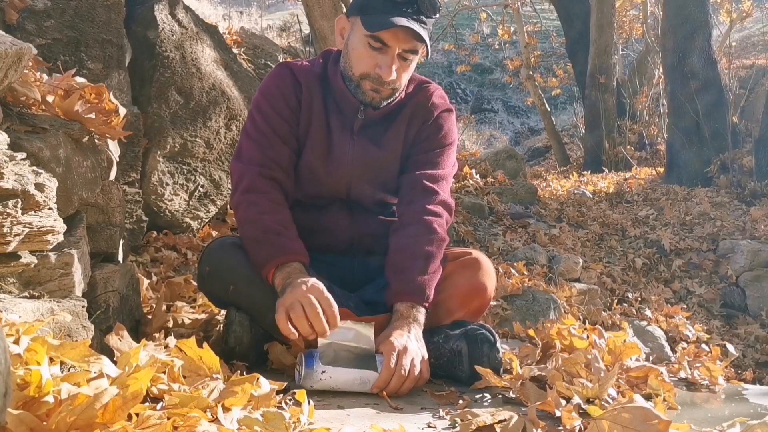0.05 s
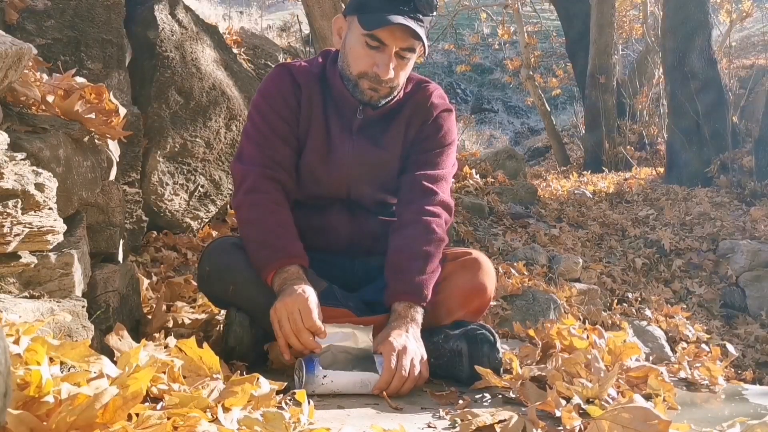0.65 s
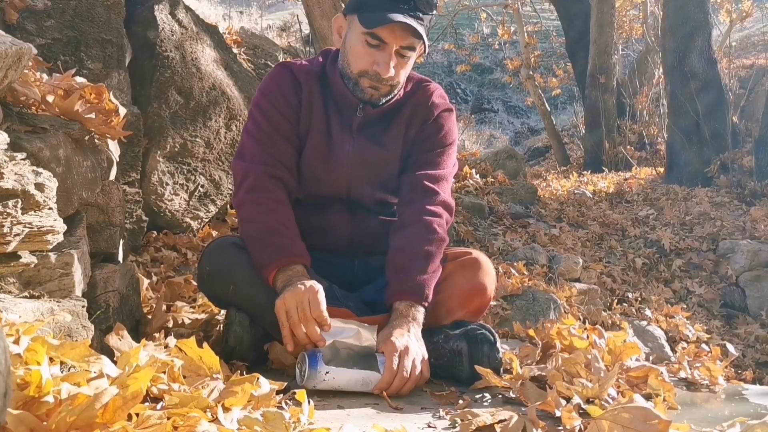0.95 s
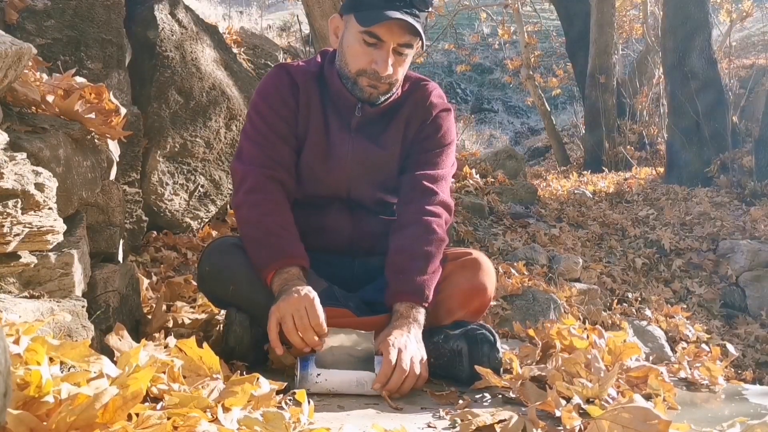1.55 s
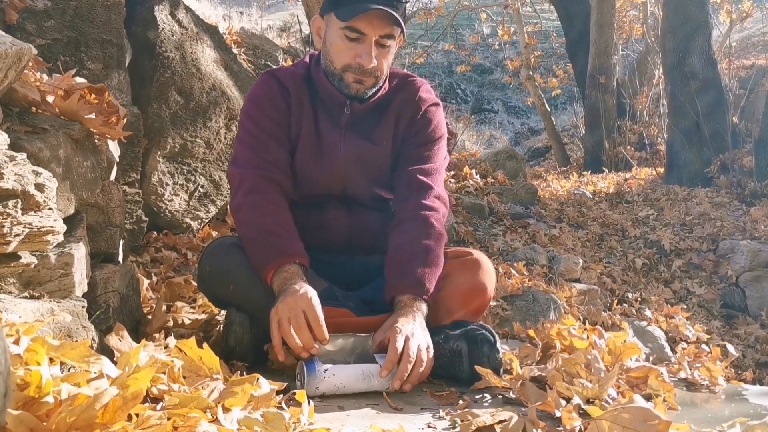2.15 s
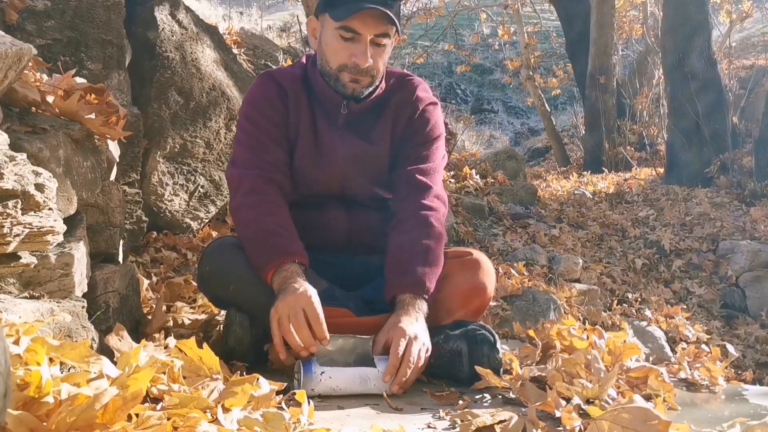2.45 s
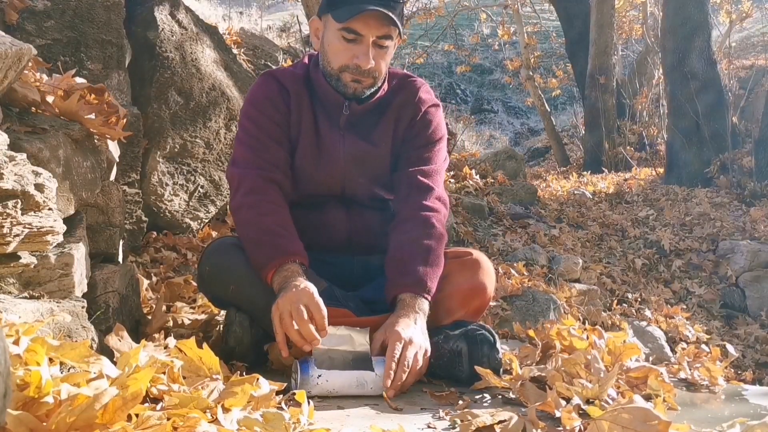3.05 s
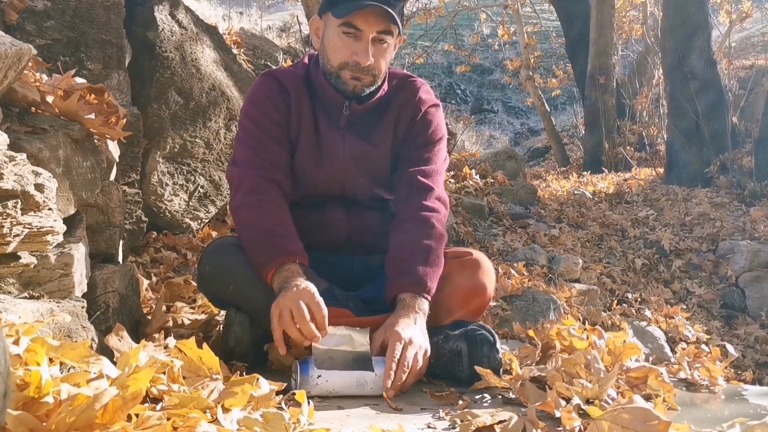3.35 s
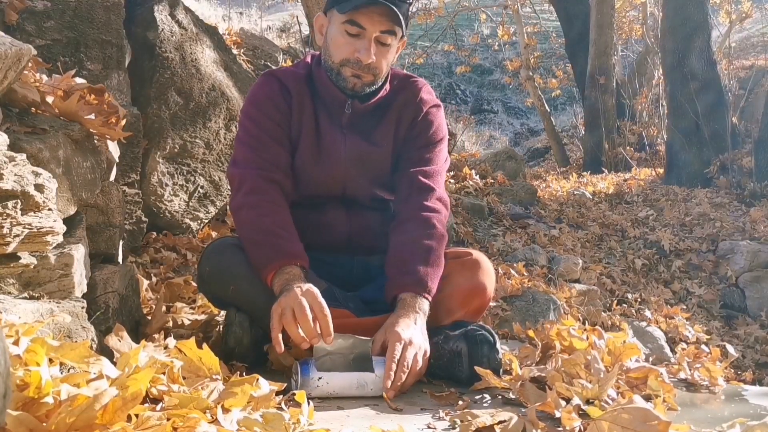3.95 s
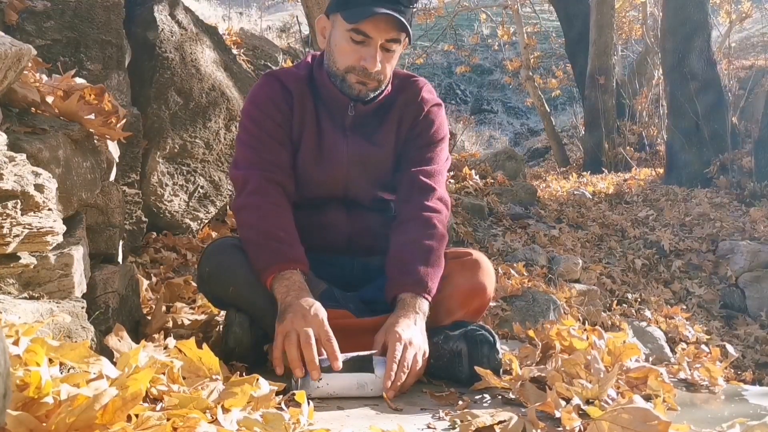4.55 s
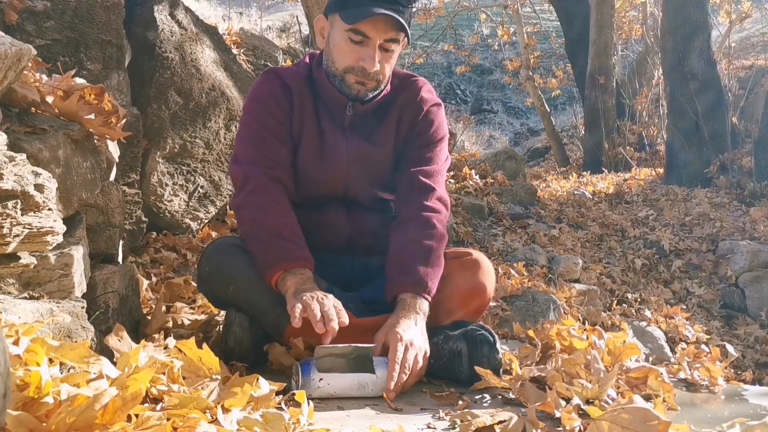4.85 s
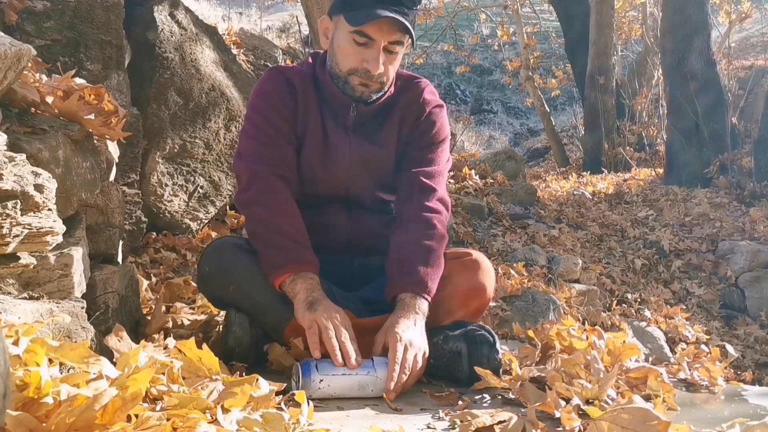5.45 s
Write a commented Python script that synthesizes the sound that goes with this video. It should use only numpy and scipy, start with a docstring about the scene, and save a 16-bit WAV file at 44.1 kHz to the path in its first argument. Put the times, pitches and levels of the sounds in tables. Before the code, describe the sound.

Outdoors, with the sound almost entirely in the right channel, thin metal cracks and crinkles in irregular bursts as a blade scrapes through a drink can. The cutting eases briefly, then the snaps come thicker as the can is bent open and rocks on a stone with soft, dull thuds. Underneath are low puffs of wind on the microphone and a few very faint, thin whistles from a far bird.

```python
"""A light breeze rumbles on the microphone as a knife starts to scrape through an aluminium drink can
lying on a stone. The thin wall buckles in short snaps between strokes; rocks and dry leaves scatter the
sound. Puffs of air bump the microphone, and from 1.3 s a far bird whistles. After a lull the flap is bent
open in more snaps, and from 4.4 s the can rocks on the stone. Nearly everything is on the right channel."""
import sys
import numpy as np
from scipy import signal
from scipy.fft import rfft, irfft, next_fast_len
from scipy.io import wavfile
from scipy.ndimage import uniform_filter1d, map_coordinates

SR = 44100
rng = np.random.default_rng(int(sys.argv[2]) if len(sys.argv) > 2 else 0)


def transcribe(u):
    """Save the signal u as a 16-bit wav file named by the first command-line argument.

    u: samples, shape (n,) or (channels, n), limited to [-1, 1]; the rate is SR.
    q: integer samples, one column per channel.
    """
    v = np.clip(np.atleast_2d(u).T, -1, 1)
    q = np.round(v * 32767).astype(np.int16)
    wavfile.write(sys.argv[1], SR, q)


N = 242991

# bright spectrum of tearing metal, for blade grit and cracks: frequency_hz, level_db
TEAR_SPECTRUM = [(150, -58.5), (500, -30.5), (2500, -4.5), (4800, -5.5), (7000, -1), (11000, 2.5),
                 (13000, 4), (14200, -4.5), (15600, -2)]


def amp(db):
    """Decibels to gain."""
    return 10 ** (np.asarray(db) / 20)


def unit(x):
    """Scale to rms 1."""
    return x / np.sqrt(np.mean(x ** 2) + 1e-20)


def along(points, hz):
    """Read (frequency_hz, value) points on a log frequency axis."""
    points_hz, values = np.transpose(points)
    return np.interp(np.log(hz + 1), np.log(points_hz + 1), values)


def filtered(x, response):
    """EQ x with a gain given as a function of frequency."""
    n = x.shape[-1]
    padded = next_fast_len(n + 4096)
    return irfft(rfft(x, padded) * response(np.fft.rfftfreq(padded, 1 / SR)), padded)[..., :n]


def noise(spectrum, n):
    """n samples of coloured noise at rms 1."""
    return unit(filtered(rng.standard_normal(n), lambda hz: amp(along(spectrum, hz))))


def wobble(rate, n):
    """A smooth random curve, rate knots a second."""
    knots = rng.standard_normal(int(n * rate / SR) + 4)
    return map_coordinates(knots, [np.arange(n) * rate / SR])


def add(track, start_s, sound):
    """Mix a sound into the track."""
    start = max(round(start_s * SR), 0)
    part = track[start:start + len(sound)]
    part += sound[:len(part)]


def tone(hz, t):
    """A sine of rms 1 at a random phase."""
    return np.sqrt(2) * np.sin(2 * np.pi * (hz * t + rng.random()))


def burst(x, t, attack_s, hold_s, t60_s):
    """Shape x into a hit: driven while the metal gives way, then dying."""
    envelope = (1 - np.exp(-t / attack_s)) * amp(-60 * np.maximum(t - hold_s, 0) / t60_s)
    return unit(x * envelope) * np.sqrt(np.mean(envelope ** 2))


def breeze():
    """Eddies make a low, lumpy rumble on the microphone, with a few single pushes of air."""
    # rise and fall of the wind: time_s, relative_db
    swells = [(0.0, -73.5), (0.11, -64), (0.64, -65.5), (0.95, -66), (1.2, -68), (1.61, -63.5), (1.79, -71),
              (2.47, -65.5), (2.67, -57.5), (2.81, -55.5), (3.19, -77.5), (3.93, -71), (4.21, -60),
              (4.47, -70.5), (5.09, -66.5), (5.51, -58.5)]
    # wind on the microphone: frequency_hz, level_db
    rumble_spectrum = [(8, -8), (22, 1.5), (38, -1.5), (60, -7), (100, -25.5), (160, -27.5), (400, -47.5),
                       (1500, -94.5)]
    # pushes of air: centre_s, peak_db
    puffs = [(0.491, -43.5), (0.851, -31.5), (1.052, -46), (1.273, -46.5), (1.45, -35.5), (2.221, -46.5),
             (2.702, -34), (3.551, -47), (4.147, -38), (5.308, -38.5), (5.41, -45)]
    swell_s, swell_db = np.transpose(swells)
    eddies_db = 1.5 * wobble(7, N)
    strength_db = np.interp(np.arange(N) / SR, swell_s, swell_db) + eddies_db
    out = amp(strength_db + 9) * noise(rumble_spectrum, N)
    t = np.arange(-SR // 20, SR // 20) / SR
    phase = 2 * np.pi * 42.75 * t
    push = phase / (1 + (phase / 2.38) ** 2) ** 3  # pressure swings once down and once up
    push = push / np.abs(push).max() * signal.windows.tukey(len(t))
    for centre_s, peak_db in puffs:
        add(out, centre_s + t[0], amp(peak_db) * push)
    return out


def dented(x, depth_db):
    """Each dent shifts the wall's resonances: fresh peaks and dips on a 170 Hz grid."""
    knots = rng.standard_normal(200)
    return unit(filtered(x, lambda hz: amp(depth_db * map_coordinates(knots, [hz / 170], mode="mirror"))))


def can_ring(t, knock_db, crinkle_db):
    """The knock feeds the can's low modes and the crinkle its high ones, at new strengths each time."""
    # modes of the whole can: pitch_hz, relative_db, t60_s
    modes = [(602.7, -3, 0.13), (905, -17.5, 0.74), (993, 0.5, 0.088), (1104, -12.5, 0.063),
             (1190, -18.5, 0.12), (1251, 3, 0.11), (1370, -25, 0.6), (1856, 1, .1), (2270, -1, .1),
             (2440, -19.5, .4), (2940, -13.5, 0.24), (3570, -7, 0.18), (4400, -17, .12)]
    drive = [(1200, knock_db), (1900, crinkle_db)]
    out, highest_hz = np.zeros(len(t)), modes[-1][0]
    for hz, relative_db, t60_s in modes:
        level_db = along(drive, hz) + relative_db + 4 * rng.uniform(-1, 1)
        detune = 0.035 * rng.uniform(-1, 1) * hz / highest_hz  # a dent retunes high modes most
        out += amp(level_db - 60 * t / t60_s) * tone(hz * (1 + detune), t)
    return out


def blade_scrapes():
    """The blade catches and slips along the cut edge; every slip ticks and briefly rings the wall."""
    # blade strokes: start_s, length_s, relative_db
    strokes = [(0.112, 0.028, -64.5), (0.256, .04, -52), (0.682, 0.042, -62.5), (0.749, 0.072, -44.5),
               (1.093, 0.037, -56.5), (1.215, 0.0076, -57), (1.494, 0.093, -57.5), (1.614, 0.065, -60),
               (2.049, 0.097, -56.5), (2.355, 0.1, -63), (2.532, 0.034, -53.5), (2.91, .02, -49.5),
               (3.136, 0.03, -53.5), (3.26, .015, -63.5), (3.774, 0.022, -60), (3.982, 0.013, -59),
               (4.049, 0.03, -58), (4.759, 0.017, -47.5), (4.959, 0.029, -57.5)]
    # the scraped wall: frequency_hz, level_db
    body_spectrum = [(100, -31.5), (350, -22.5), (650, -7), (950, 7), (1400, -10.5), (2500, -6.5),
                     (4000, -18), (7000, -18.5), (16000, -32)]
    slips_per_s, light_stroke_db = 380, -60
    out, t = np.zeros(N), np.arange(SR // 12) / SR
    for start_s, length_s, stroke_db in strokes:
        # a light stroke skates and is gritty; a heavy one digs in
        grit_db = -10.5 - 0.35 * (stroke_db - light_stroke_db)
        n = max(round(length_s * SR), 64)
        slips = (rng.random(n) < slips_per_s / SR) * rng.exponential(size=n) ** 2
        slips = (slips + 0.003) * signal.windows.tukey(n, 0.7)
        envelope = lambda t60_s: np.sqrt(np.abs(signal.fftconvolve(slips, amp(-60 * t / t60_s) ** 2)))
        with_tail = n + len(t) - 1
        body = unit(envelope(t60_s=0.04) * dented(noise(body_spectrum, with_tail), depth_db=4))
        grit = unit(envelope(t60_s=0.009) * noise(TEAR_SPECTRUM, with_tail))
        ticks = slips * rng.standard_normal(n)
        hollow = unit(signal.fftconvolve(ticks, can_ring(t, 0, 0) * (1 - t / t[-1])))
        scrape = body + amp(grit_db) * grit + amp(-7) * hollow
        add(out, start_s, amp(stroke_db - 1.5) * np.sqrt(n / with_tail) * scrape)
    return out


def surroundings(x):
    """Rocks, trunks and dry leaves scatter each band's energy into a smooth, bright tail."""
    # colour of the tail: frequency_hz, relative_db
    scatter_eq = [(200, -16), (700, -0.5), (1500, -7), (3000, -7.5), (5500, 2.5), (9000, 0), (15000, 0.5)]
    # decay of the tail: frequency_hz, t60_s
    decay_times = [(300, 0.18), (1000, 0.28), (3000, 0.47), (6000, 0.43), (11000, 0.37), (14500, 0.28),
                   (16000, 0.12)]
    hz, t, bands = signal.stft(x, SR, nperseg=256)
    power = uniform_filter1d(np.abs(bands) ** 2, size=7, axis=0)
    t = t[t < 1]
    bloom = 1 - np.exp(-(t / 0.014) ** 2)
    fade = (amp(-60 * t / along(decay_times, hz)[:, None]) * bloom) ** 2
    fade /= fade.sum(axis=1, keepdims=True)
    tail_power = signal.fftconvolve(power, fade, axes=1)[:, :bands.shape[1]]
    wash = signal.stft(rng.standard_normal(N), SR, nperseg=256)[2]
    tail = wash / wash.std() * np.sqrt(np.abs(tail_power)) * amp(along(scatter_eq, hz))[:, None]
    return signal.istft(tail, SR, nperseg=256)[1][:N]


def buckle_snaps():
    """Each buckle knocks the bent panel, crinkles the wall's dense upper modes and cracks as it tears."""
    # buckles of the sheet: start_s, knock_db, crinkle_db, crack_db, pitch_hz, cutoff_hz, t60_s
    buckles = [(0.3007, -40, -49, -66, 973, 1500, 0.038), (0.3083, -27.5, -19.5, -17.5, 585, 3500, 0.035),
               (.454, -26, -28, -24.5, 1254, 4200, 0.045), (0.4844, -35.5, -41.5, -39, 652, 6950, 0.065),
               (0.547, -62, -48, -54, 790, 3800, 0.076), (0.7915, -23.5, -24, -18, 988, 3820, 0.055),
               (0.9303, -25.5, -20, -14.5, 800, 3560, 0.04), (1.13, -46, -49.5, -56, 792, 1510, .12),
               (1.393, -67.5, -65.5, -53, 722, 6960, 0.16), (1.654, -37, -30, -31.5, 983, 7000, 0.047),
               (1.667, -25.5, -33, -52, 884, 3470, 0.066), (1.7176, -23.5, -28, -44, 1070, 4860, 0.06),
               (1.7952, -26, -20, -17.5, 916, 2205, 0.1), (1.859, -38.5, -50.5, -49, 1008, 3030, 0.098),
               (1.9607, -36, -47.5, -62, 1003, 2110, 0.18), (2.454, -37.5, -52, -67, 982, 3080, 0.063),
               (2.696, -30.5, -28, -76.5, 960, 4650, 0.062), (2.7742, -26, -23, -22.5, 1227, 3920, 0.062),
               (2.983, -51.5, -46, -59.5, 940, 1680, 0.073), (3.8824, -37.5, -25, -43, 874, 3150, 0.064),
               (4.108, -29.5, -25, -49.5, 1027, 4160, .051), (4.235, -68, -37.5, -37.5, 1260, 1490, 0.032),
               (4.252, -47.5, -47.5, -49, 953, 1510, 0.052), (4.297, -68, -33, -39, 970, 1870, 0.066),
               (4.359, -36.5, -34.5, -71, 766, 3930, 0.058), (4.417, -38, -52.5, -74.5, 655, 2300, 0.042),
               (4.5879, -37, -67, -84, 659, 2400, 0.054), (4.7736, -36.5, -29.5, -36.5, 777, 6040, 0.054),
               (4.824, -40, -41, -41, 700, 2830, 0.13), (4.845, -26.5, -23.5, -52, 806, 1890, 0.078),
               (5.0986, -25.5, -33.5, -55.5, 1094, 3120, 0.073),
               (5.134, -31.5, -45, -70, 1205, 2420, 0.066), (5.1669, -30.5, -28, -25, 812, 4520, 0.1),
               (5.1823, -27, -26.5, -16.5, 1250, 3940, 0.08), (5.224, -28.5, -27, -26.5, 657, 5340, 0.045),
               (5.441, -31, -32.5, -42, 580, 2310, .066), (5.4732, -27, -36.5, -51, 596, 2230, 0.065),
               (5.4892, -39.5, -41, -19.5, 792, 3560, 0.41)]
    # the panel's low modes: frequency_hz, level_db
    knock_spectrum = [(60, -51.5), (180, -30), (300, -18), (420, -19.5), (500, -1.5), (590, 1.5),
                      (700, -0.5), (900, 6.5), (1300, -6), (1800, -13.5), (4000, -40.5), (8000, -81)]
    # the wall's upper modes: frequency_hz, level_db
    crinkle_spectrum = [(100, -73.5), (300, -36), (900, -9.5), (1500, -6), (2400, -1.5), (3500, -5),
                        (6500, -4), (16000, -0.5)]
    # a tear lets the strained can jolt against the stone: frequency_hz, level_db
    jolt_spectrum = [(100, -34.5), (220, -16.5), (320, -17.5), (480, -2), (700, -9.5), (1500, -34.5)]
    n = SR // 4
    out, t = np.zeros(N), np.arange(n) / SR
    for start_s, knock_db, crinkle_db, crack_db, pitch_hz, cutoff_hz, t60_s in buckles:
        # a smaller crease is brighter and has a higher overtone
        overtone_hz = 2450 * (cutoff_hz / 4100) ** 0.22
        panel = dented(noise(knock_spectrum, n), depth_db=3.5) + amp(-1.5) * tone(pitch_hz, t)
        wall = filtered(noise(crinkle_spectrum, n), lambda hz: (1 + (hz / cutoff_hz) ** 6) ** -0.5)
        wall = dented(wall, depth_db=5) + amp(-6) * tone(overtone_hz, t)
        # a tear is a quick run of tiny fractures
        tear = dented(noise(TEAR_SPECTRUM, n) * amp(3.1 * wobble(1500, n)), depth_db=3)
        knock = amp(knock_db) * burst(panel, t, attack_s=0.0004, hold_s=0.0032, t60_s=t60_s)
        crinkle = amp(crinkle_db) * burst(wall, t, attack_s=0.00043, hold_s=0.0026, t60_s=0.99 * t60_s)
        crack = amp(crack_db) * burst(tear, t, attack_s=0.00056, hold_s=0.0039, t60_s=0.026)
        stone = noise(jolt_spectrum, n)
        jolt = amp(crack_db - 22.5) * burst(stone, t, attack_s=0.0008, hold_s=0.003, t60_s=0.025)
        ring = amp(-17.5) * can_ring(t, knock_db, crinkle_db) * (1 - np.exp(-t / 0.0015))
        # the panel's own mode outlasts the knock
        linger = amp(knock_db - 13 - 60 * t / (2.3 * t60_s)) * (1 - np.exp(-t / 0.001))
        ring += linger * tone(pitch_hz, t)
        add(out, start_s, knock + crinkle + crack + jolt + ring)
        # the metal starts to yield a moment before it gives way
        yielding = burst(wall + panel, t, attack_s=0.0017, hold_s=0.002, t60_s=0.017)
        add(out, start_s - 0.002, amp(max(crack_db, crinkle_db) - 20.5) * yielding)
    return out


def far_bird():
    """Thin whistles, each lower than the last, sag and fade, smeared by many paths between the trees."""
    # the bird's calls: start_s, length_s, level_db
    whistles = [(1.295, 0.16, -80), (1.95, .18, -77), (2.36, 0.15, -74), (3.584, 0.31, -76.5),
                (4.037, 0.1, -79.5)]
    pitch_hz, drift_hz_per_s, sag_hz_per_s, fade_db_per_s = 4660, 94, 320, 29.5
    out = np.zeros(N)
    for start_s, length_s, level_db in whistles:
        n = round(length_s * SR)
        t = np.arange(n) / SR
        hz = pitch_hz - drift_hz_per_s * start_s - sag_hz_per_s * t
        phase = 2 * np.pi * np.cumsum(hz) / SR
        blur = lambda: wobble(110, n) + wobble(420, n)
        whistle = blur() * np.sin(phase) + blur() * np.cos(phase)
        envelope = signal.windows.tukey(n, 0.5) * amp(-fade_db_per_s * t)
        add(out, start_s, amp(level_db) * unit(whistle * envelope))
    return out


def stone_thuds():
    """The can rocks as the flap is bent, and the stone gives a short, dull answer."""
    # bumps on the stone: start_s, level_db
    bumps = [(4.359, -58.5), (4.846, -49.5), (5.101, -59), (5.185, -63.5), (5.226, -68), (5.474, -55)]
    # body of a bump: frequency_hz, level_db
    thud_spectrum = [(60, -20.5), (140, -25), (195, 0), (260, -4), (400, -13), (1000, -48.5)]
    out, t = np.zeros(N), np.arange(SR // 4) / SR
    for start_s, level_db in bumps:
        thud = burst(noise(thud_spectrum, len(t)), t, attack_s=0.0028, hold_s=0.0057, t60_s=0.19)
        add(out, start_s, amp(level_db) * thud)
    return out


def scene():
    """The right channel carries the mix and leaks faintly into the left; each has its own hiss."""
    # bleed from right into left: frequency_hz, gain_db
    leak_eq = [(300, -31), (1200, -33.5), (2200, -38.5), (12000, -45.5)]
    # left noise floor: frequency_hz, level_db
    left_hiss = [(20, 23.5), (60, 11), (150, -2), (400, -6), (1000, -14), (2500, -16.5), (5000, -17.5),
                 (8000, -30), (16000, -25)]
    # right noise floor: frequency_hz, level_db
    right_hiss = [(30, -3.5), (150, -3), (400, -3.5), (1000, -8), (2500, -11.5), (5000, -16.5),
                  (8000, -21.5), (11500, -15), (13200, -16), (14300, -16.5), (15800, -18.5)]
    can = buckle_snaps() + blade_scrapes() + stone_thuds()
    mix = can + amp(-18) * surroundings(can) + breeze() + far_bird()
    left = filtered(mix, lambda hz: amp(along(leak_eq, hz))) + amp(-67.5) * noise(left_hiss, N)
    right = mix + amp(-69.5) * noise(right_hiss, N)
    return np.array([left, right])


def record(dry):
    """The recorder rolls off steeply at its band limit."""
    cutoff_hz = 15950
    return filtered(dry, lambda hz: 1 / (1 + (hz / cutoff_hz) ** 110))


dry = scene()
out = record(dry)
transcribe(out)
```